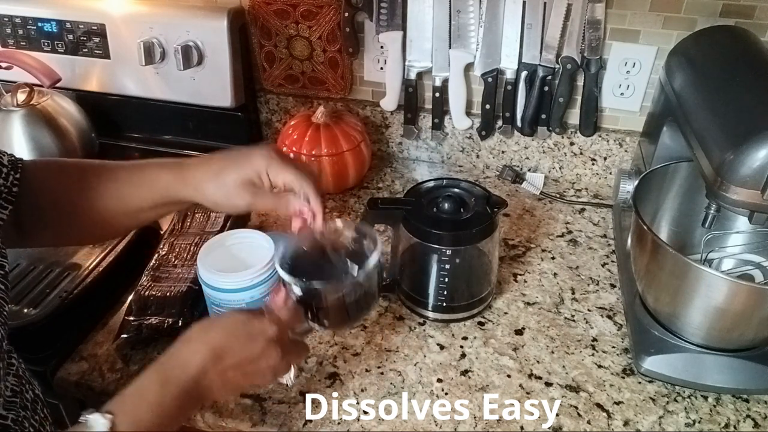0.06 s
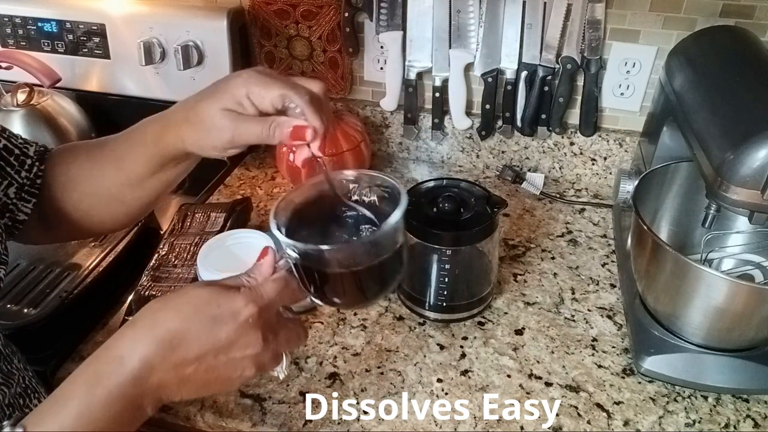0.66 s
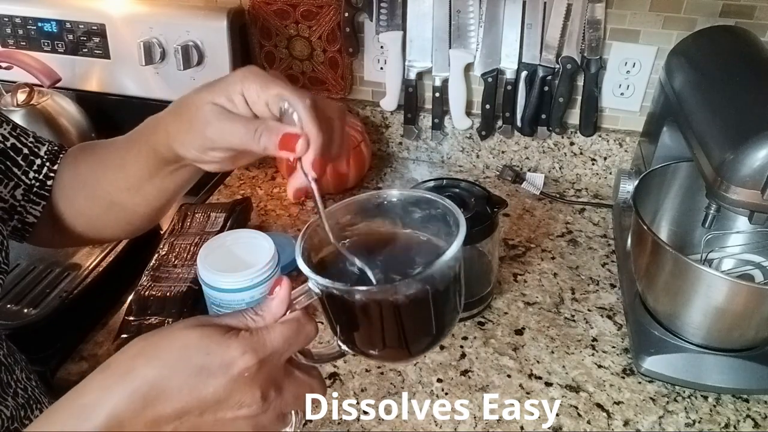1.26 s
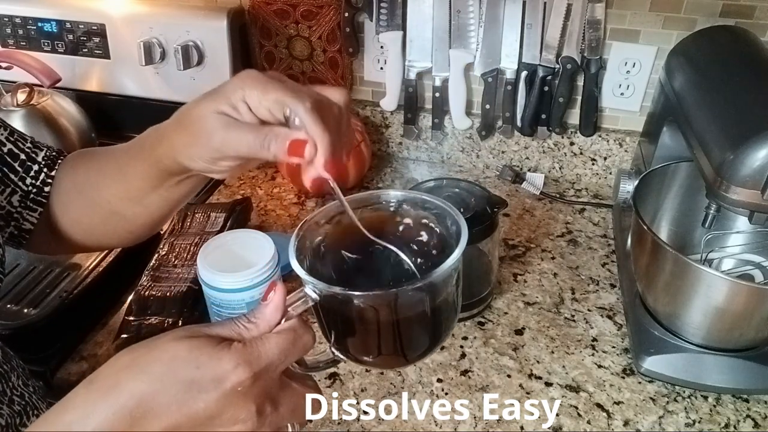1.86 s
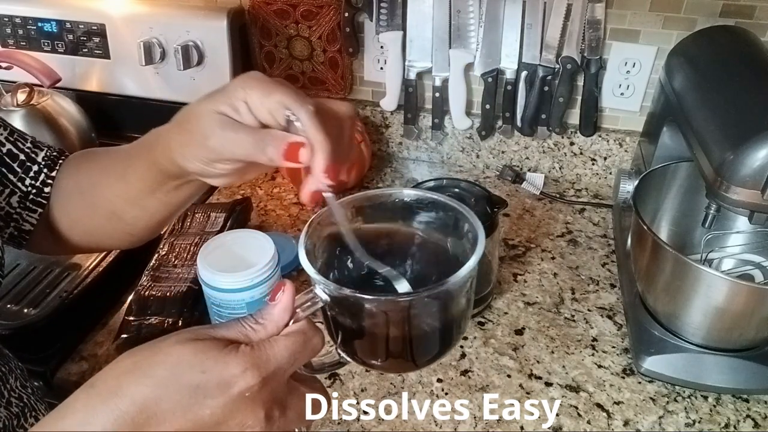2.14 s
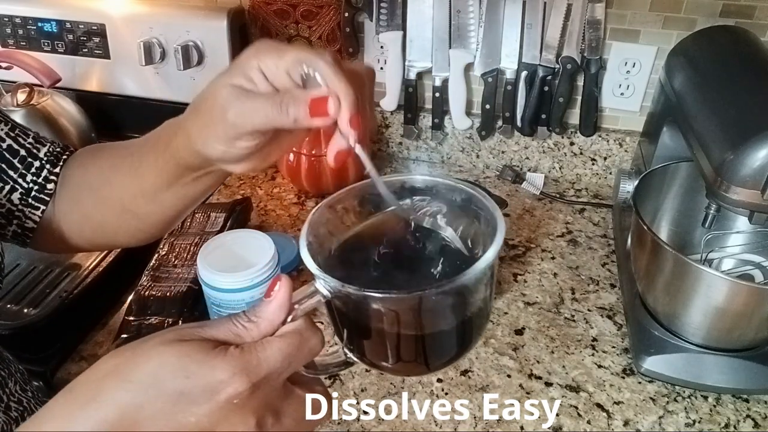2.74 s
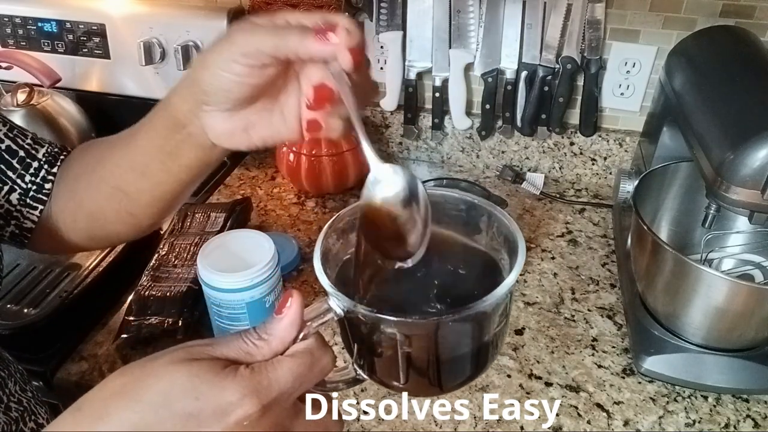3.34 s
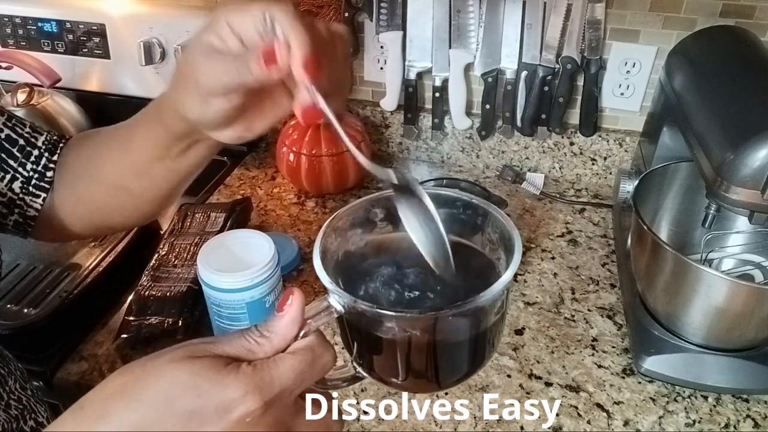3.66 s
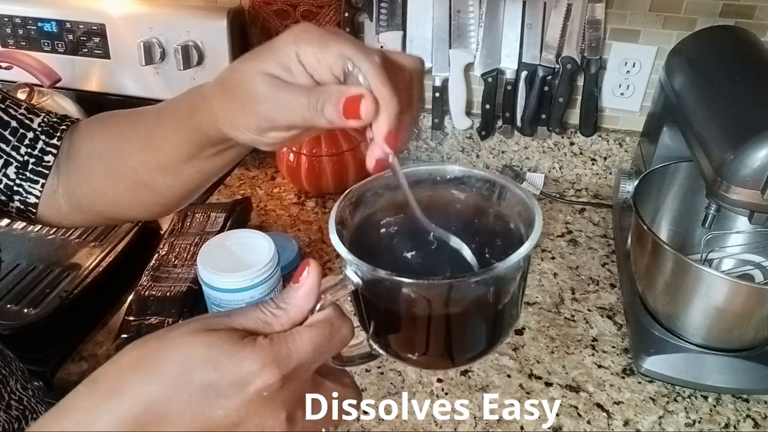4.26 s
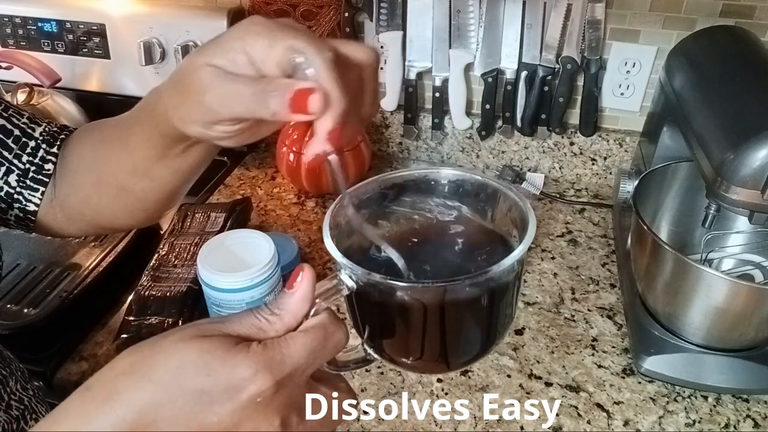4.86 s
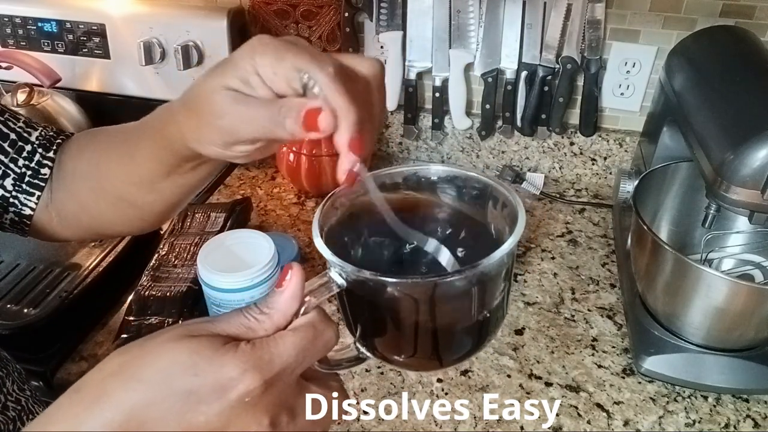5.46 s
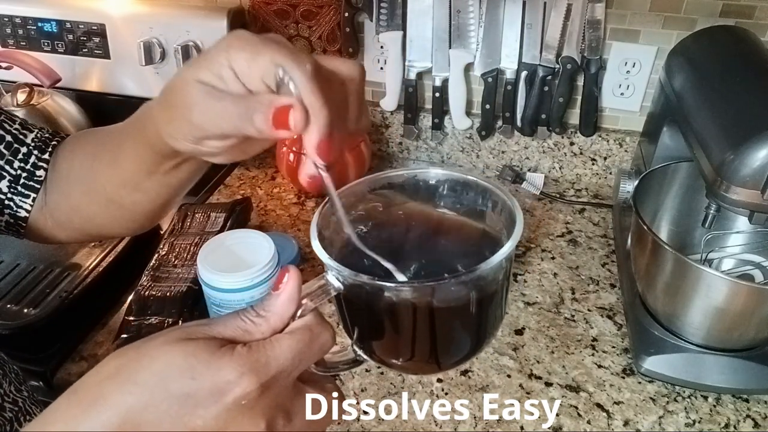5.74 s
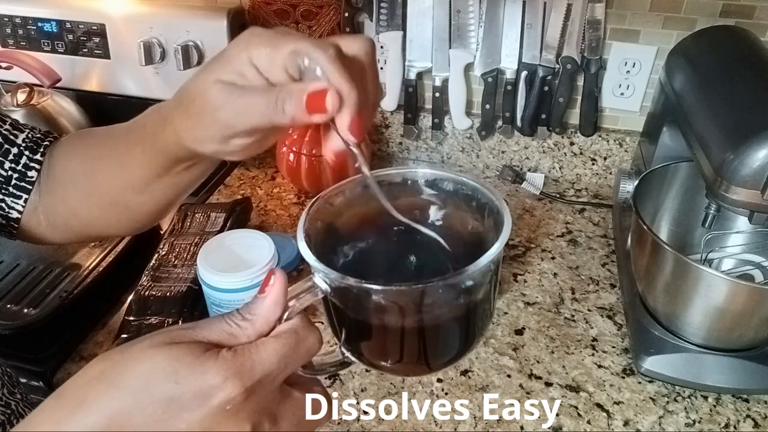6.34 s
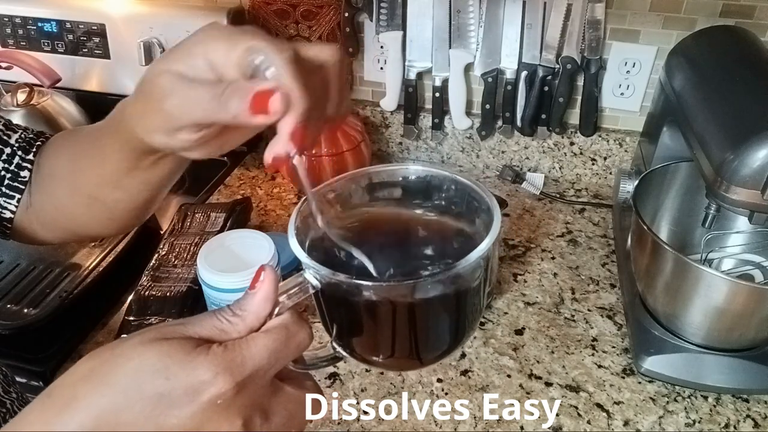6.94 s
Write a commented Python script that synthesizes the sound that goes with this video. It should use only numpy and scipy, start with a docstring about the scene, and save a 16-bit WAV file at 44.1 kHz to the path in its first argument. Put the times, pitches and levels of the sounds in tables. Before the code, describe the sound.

In a small kitchen with a faint refrigerator hum, a metal spoon clinks irregularly against a filled glass mug, heard up close. Each touch rings briefly, and the spoon sometimes scrapes or slides along the glass. Midway come a sharp clink, a few drips and a little plop, then the loudest clink. Lighter stirring carries on until the mug gives a quiet, hollow double knock.

```python
"""A refrigerator hums in a small kitchen while, close to a phone, a steel spoon stirs coffee in a glass mug.
Each clink rings the glass and some rebound; the spoon scrapes the wall, sings as it slides over the bottom
and nudges the side, while small bubbles ring in the swirl. Around three seconds in it is lifted out, drips
and dips back with a gulp. The hardest clink follows, the stirring goes on, and near the end the mug gives
a low, hollow double knock. Counter and tiles throw every touch back."""
import sys
import numpy as np
from scipy import signal
from scipy.fft import rfft, irfft, next_fast_len
from scipy.io import wavfile

SR = 44100
rng = np.random.default_rng(int(sys.argv[2]) if len(sys.argv) > 2 else 0)


def inscribe(sig):
    """Save sig as 16-bit PCM at rate SR to the path in sys.argv[1].

    A 1-D sig is mono; a 2-D sig holds one channel per row.
    Samples are clipped to [-1, 1] before scaling.
    """
    pcm = np.round(np.clip(np.atleast_2d(sig).T, -1, 1) * 32767)
    wavfile.write(sys.argv[1], SR, pcm.astype(np.int16))


N = 317079

# refrigerator partials: f/Hz, level/dB
FRIDGE_PARTIALS = [(59.2, -93), (80.7, -83), (162.5, -70.5), (328.4, -88), (360.7, -84.5)]
# colour of the room tone: f/Hz, relative level/dB
AIR_SPECTRUM = [(25, -3), (45, -3), (75, 8), (105, -2.5), (220, -0.5), (380, -5), (480, -13.5), (800, -18),
                (2000, -25.5), (7000, -27.5), (7950, -19.5), (9000, -23.5), (13000, -35), (15500, -36.5),
                (16500, -51)]
# spoon hits on the wall: t/s, strength/dB, hardness/(dB per octave), angle (0 edge first, 1 flat),
# featured partial f/Hz, low ring offset/dB, crack offset/dB, rebound delay/s, left minus right/dB
SPOON_HITS = [(0.0219, -40.5, 2, 0.48, 5960, -10, -4, 0.025, 2.5),
              (0.106, -51.5, -0.5, 0.54, 6010, -18, 0, 0, 3.5),
              (0.4798, -37, -2.5, 1, 5010, -13, -10.5, 0.015, -3),
              (.688, -63, 12.5, 1, 9630, -35, -5.5, 0.00087, 0),
              (1.3619, -30.5, 4, 0.4, 9050, -17.5, -2.5, 0.0038, -0.5),
              (1.5173, -30.5, 2, 0, 5400, -16, -3, 0.027, 2),
              (1.5619, -41.5, -1, 0.15, 2826, 1, -3, 0.0022, 3.5),
              (1.9342, -28, 0.5, 0, 9070, -12.5, 0, 0.00011, 1.5),
              (1.9775, -42, 3.5, 1, 8130, -5, 4, 0.0077, 4.5),
              (2.1419, -46, -2.5, 0.93, 2787, -12, 3.5, 0.00021, 1.5),
              (2.677, -31.5, 6.5, 0.48, 5060, -17, -0.5, 0.0027, -2.5),
              (2.7888, -33.5, 2.5, 0.48, 4990, -19, -6, 0.0064, 2),
              (2.9094, -19.5, 4, 0.029, 3196, -17, -8, 0.00079, 4.5),
              (3.893, -18, 6, 0.53, 5787, -7.5, -2, 0, 2),
              (4.0113, -27, 3.5, 0.84, 8190, -9, 0.5, 0.002, 3),
              (4.2284, -29.5, 2.5, 0.029, 9480, -18, 3.5, 0, 0.5),
              (4.3502, -51.5, 0.5, 0.12, 9340, -16.5, -0.5, 0.0011, -1.5),
              (4.7661, -33.5, -2, 0.057, 9730, -8.5, 0.5, 0.014, 3),
              (4.798, -36, -0.5, 0.94, 8160, -5, -2.5, 0.0039, 2),
              (5.2011, -37, -1, 0, 6030, -10.5, 2.5, 0.00017, 1),
              (5.9542, -33.5, -0.5, 0.52, 9730, -10.5, 3, 0.015, -0.5),
              (5.994, -32.5, -2.5, 0.83, 8150, -20, -7.5, 0.011, 1),
              (6.4178, -35, -0.5, 0.32, 2834, -26, -8, .015, -1),
              (6.818, -46.5, -0.5, 0.23, 10000, -4.5, 6, 0.017, -6)]
# modes of the filled mug with the spoon in it: f/Hz, level/dB, t60/s
MUG_MODES = [(1100, -6, .09), (1208, -1, .62), (1900, -13, .14), (2130, -8, .2), (2760, -8, .25),
             (2820, -2, .4), (3290, -7, .3), (3950, -16, .18), (4920, -6, .2), (5000, -2, .4),
             (5520, -7, .18), (5700, -5, .22), (6055, -4, .36), (6680, -15, .14), (7260, -11, .26),
             (8000, -7, .22), (8150, -2, .3), (8990, -2, .28), (9220, -4, .2), (9480, -5, .2),
             (9880, -4, .18), (10190, -12, .16), (11950, -13, .15), (13100, -13, .14), (14250, -20, .1)]
# colour of the contact crack: f/Hz, relative level/dB
CRACK_SPECTRUM = [(600, -12.5), (850, -8), (1150, 9), (1800, 1), (3200, 6.5), (4400, -0.5), (5600, 10.5),
                  (7400, -4.5), (9500, 9), (10800, -6), (12000, -6.5), (14000, -12.5), (15500, -19),
                  (16500, -25)]
# the spoon drags along the wall after a hit: t/s, length/s, level/dB
WALL_SCRAPES = [(0.03, .1, -57), (1.377, .13, -52.5), (4.239, 0.15, -49.5), (6.833, 0.12, -55)]
# its edge slides over the glass: t/s, nominal length/s, level/dB
EDGE_SLIDES = [(.582, 0.082, -78), (0.725, 0.026, -63.5), (1.154, 0.032, -71), (1.775, 0.024, -61),
               (2.282, 0.11, -68.5), (4.608, 0.023, -53.5), (4.981, 0.024, -68.5), (5.434, 0.024, -55),
               (5.571, 0.095, -70), (5.802, 0.039, -60.5), (6.197, 0.027, -67), (6.606, 0.034, -64),
               (7.029, 0.088, -73)]
# drips and bubbles, then the mug's low, hollow double knock (last two rows): t/s, starting f/Hz, level/dB
DRIPS_AND_KNOCKS = [(1.479, 5500, -32.5), (3.04, 2203, -36.5), (3.171, 1555, -49), (3.487, 13500, -42.5),
                    (3.509, 6200, -36.5), (3.524, 9480, -28.5), (3.549, 1640, -36.5), (3.566, 2810, -42),
                    (3.572, 1390, -50), (3.556, 8200, -41), (3.575, 4797, -43.5), (3.629, 5530, -43),
                    (3.724, 1810, -51.5), (3.723, 10260, -41.5), (4.398, 4410, -43), (5.156, 3660, -43),
                    (5.517, 3850, -42.5), (5.544, 11100, -45), (6.361, 3870, -50), (6.381, 10200, -49),
                    (6.765, 9670, -38), (6.822, 902, -42), (6.846, 831, -41.5)]
# the spoon leans softly on the wall: t/s, level/dB
WALL_NUDGES = [(1.722, -63.5), (4.561, -63.5), (4.62, -65.5), (4.984, -58), (5.432, -51.5), (5.754, -67),
               (6.152, -57), (6.575, -63)]
# contour of the gulp as the spoon dips back in: t/s, level/dB, resonance f/Hz
GULP_CONTOUR = [(3.50, -85.5, 2010), (3.526, -46.5, 1828), (3.547, -55, 1550), (3.573, -55.5, 1361),
                (3.60, -73, 1348), (3.68, -83, 1500)]
# shading of the microphones by the phone's body: f/Hz, left minus right/dB
MIC_SHADE = [(1200, -3.5), (3000, -3.5), (5200, -1), (7000, 10.5), (9200, -13.5), (14000, -5)]

REGISTER_EDGES_HZ = [2400, 4400, 7700, 11000]  # between low, middle, high, bright and sparkle
# voicing of the middle, high and bright registers for edge-first and flat hits
EDGE_DB, EDGE_LEADS_HZ = [-9.5, -14, -2], [2500, 7200, 9020]
FLAT_DB, FLAT_LEADS_HZ = [-6.5, -4, -6.5], [2825, 5000, 8150]
REGISTER_OCTAVES = [-.75, .15, .9]


def undb(db):
    """Decibels to gain."""
    return 10 ** (np.asarray(db) / 20)


def unit(x):
    """Scale to rms 1."""
    return x / np.sqrt(np.mean(x ** 2))


def seconds(length):
    """Time axis."""
    return np.arange(int(length * SR)) / SR


def fade(t, t60):
    """Exponential decay, 60 dB down at t60."""
    return np.exp(-np.log(1000) * t / t60)


def attack_level(x):
    """Root of the power in the first 20 ms, channels summed."""
    return np.sqrt(np.sum(np.mean(x[..., :SR // 50] ** 2, axis=-1)))


def noise(points, size):
    """White noise coloured by a spectrum of (Hz, dB) points."""
    hz, db = np.transpose(points)
    bins_hz = np.maximum(np.fft.rfftfreq(size, 1 / SR), 1)
    colour = undb(np.interp(np.log(bins_hz), np.log(hz), db))
    return irfft(rfft(rng.standard_normal(size)) * colour, size)


def band(x, lo_hz, hi_hz, order=4):
    """Band-pass filter."""
    return signal.sosfilt(signal.butter(order, [lo_hz, hi_hz], "band", fs=SR, output="sos"), x)


def drift(rate_hz):
    """Slow random modulation with a spread near 1."""
    return np.interp(np.arange(N) / SR * rate_hz, np.arange(1000), rng.standard_normal(1000))


def pan(db):
    """Channel gains for a left minus right level."""
    return undb(np.array([[db], [-db]]) / 2)


def add(out, start_s, x):
    """Mix x in at its start time."""
    i = max(int(start_s * SR), 0)
    out[..., i:i + x.shape[-1]] += x[..., :max(N - i, 0)]


def refrigerator():
    """A low hum whose partials waver in level and phase."""
    t = np.arange(N) / SR
    stereo_phase = np.array([[0], [.6]])
    hum = np.zeros((2, N))
    for hz, db in FRIDGE_PARTIALS:
        gain = np.sqrt(2) * undb(db + 0.28 * drift(12))
        hum += gain * np.sin(2 * np.pi * hz * t + .5 * drift(1.2) + stereo_phase)
    return hum * pan(3)


def room_air(level_db=-71.5, bass_hz=350, bass_side_db=-9):
    """A soft bed of room tone, wide on top and narrow in the bass."""
    mid, side = unit(noise(AIR_SPECTRUM, N)), unit(noise(AIR_SPECTRUM, N))
    bass = signal.sosfilt(signal.butter(1, bass_hz, fs=SR, output="sos"), side)
    side -= (1 - undb(bass_side_db)) * bass
    return np.array([mid + side, mid - side]) * undb(level_db + 0.84 * drift(2.1)) * pan(1)


def clinks(rebound_db=-6.5, rebound_angle=0.72, rebound_hz=5120, shortest_rebound_s=.004):
    """The spoon hits the wall and sometimes bounces, landing again softer and nearly flat."""
    out = np.zeros((2, N))
    for s, strength_db, hardness, angle, featured_hz, low_db, crack_db, rebound_s, pan_db in SPOON_HITS:
        add(out, s, hit(strength_db, hardness, angle, featured_hz, low_db, crack_db) * pan(pan_db))
        if rebound_s > shortest_rebound_s:
            rebound = hit(strength_db + rebound_db, hardness - 2, rebound_angle, rebound_hz, low_db, crack_db)
            add(out, s + rebound_s, rebound * pan(pan_db))
    return out


def hit(strength_db, hardness, angle, featured_hz, low_db, crack_db, usual_db=-30.5, contact_s=.0012):
    """Steel meets glass: the angle sets which registers ring, the hardness how bright and how long."""
    featured = np.arange(3) == np.searchsorted(REGISTER_EDGES_HZ[1:-1], featured_hz)
    upper_db = (1 - angle) * np.array(EDGE_DB) + angle * np.array(FLAT_DB)
    upper_db += 0.25 * hardness * np.array(REGISTER_OCTAVES) + 8.5 * featured
    force_db = strength_db - usual_db
    sparkle_db = -17.5 - 0.27 * force_db
    levels_db = strength_db + np.array([low_db, *upper_db, sparkle_db])
    detune = 1 + 0.0057 * rng.standard_normal(3)  # the spoon's depth retunes the leading partials
    leads_hz = np.array(FLAT_LEADS_HZ if angle > .5 else EDGE_LEADS_HZ) * detune
    leads_hz[featured] = featured_hz
    ring_scale = 0.49 + 0.02 * hardness + 0.055 * angle  # hard or flat hits damp the glass less
    clink = glass_ring(levels_db, leads_hz, 6 + 7 * featured, ring_scale, hardness)
    add(clink, 0, crack(strength_db + crack_db, hardness + .08 * force_db))  # stronger is brighter
    attack = 1 - np.exp(-np.arange(clink.shape[1]) / SR / contact_s)
    return clink * attack


def glass_ring(levels_db, leads_hz, lifts_db, ring_scale, hardness, grip_db=5, grip_t60=0.023):
    """The ring after a hit; it loses its first energy quickly while the spoon still touches."""
    hz, db, t60 = np.transpose(MUG_MODES).copy()
    register = np.searchsorted(REGISTER_EDGES_HZ, hz)
    for lead_hz, lift_db in zip(leads_hz, lifts_db):  # the nearest mode takes the lead
        k = np.argmin(abs(hz - lead_hz))
        hz[k], db[k], t60[k] = lead_hz, db[k] + lift_db, t60[k] * 1.2
    db[np.argmax(t60)] += 3  # the bowl's longest ring carries the low register
    detune = 1 + 0.0023 * rng.standard_normal(len(hz))
    modes = np.array([hz * detune, db + hardness * np.log2(hz / hz[0]), t60 * ring_scale])
    tones = np.array([mug(*modes[:, register == k]) for k in range(len(levels_db))])
    grip = 1 + undb(grip_db) * fade(np.arange(tones.shape[1]) / SR, grip_t60)
    registers = kitchen(radiate(tones * grip))
    return sum(undb(level_db) * np.array([side / attack_level(side) for side in stereo]) / np.sqrt(2)
               for level_db, stereo in zip(levels_db, registers))


def mug(hz, db, t60, stir_hz=2.35):
    """Decaying modes; the coffee climbs round the wall with each stir and bends their pitch."""
    t = np.float32(seconds(.5))
    hz, db, t60 = np.float32([hz, db, t60])[..., None]
    sway_hz = 32 * np.sqrt(1200 / hz)
    phase = 2 * np.pi * hz * t + sway_hz / stir_hz * np.sin(2 * np.pi * stir_hz * t)
    polarity = rng.choice([-1, 1], hz.shape)
    return np.sum(polarity * undb(db) * fade(t, t60) * np.sin(phase), axis=0)


def crack(level_db, tilt_db_per_octave, t60=0.039, snap_db=-4, snap_t60=.02, hump_db=3.5, hump_hz=100):
    """The contact transient: a brief rasp whose spectrum swells round each mode of the mug."""
    t = seconds(.15)
    decay = fade(t, t60) + undb(snap_db) * fade(t, snap_t60)
    hz = np.arange(500, SR / 2, 50)
    humps = sum(np.exp(-((hz - mode[0]) / hump_hz) ** 2) for mode in MUG_MODES)
    db = np.interp(hz, *np.transpose(CRACK_SPECTRUM)) + hump_db * np.minimum(humps, 1)
    db += tilt_db_per_octave * np.log2(hz / 4000)
    rasp = noise(np.transpose([hz, db]), len(t)) * decay / attack_level(decay)
    return kitchen(undb(level_db - 5) * radiate(rasp))


def radiate(x, low_cut_hz=730):
    """A small mug sends out almost no bass."""
    return signal.sosfilt(signal.butter(4, low_cut_hz, "high", fs=SR, output="sos"), x)


def kitchen(x, early_db=-4, early_t60=0.068, late_db=-11, low_t60=0.4, high_t60=.24, split_hz=4000):
    """Direct sound, slap from counter and tiles, then a darkening tail; new reflections on each call."""
    t = seconds(.3)
    early, late = rng.standard_normal((2, 2, len(t)))
    early = early * fade(t, early_t60) * (t > .001)
    dull = signal.lfilter(*signal.butter(1, split_hz, fs=SR), late)
    bloom = 1 - fade(t, 0.029)
    late = (dull * fade(t, low_t60) + (late - dull) * fade(t, high_t60)) * bloom
    paths = sum(undb(db) * echoes / np.linalg.norm(echoes, axis=1, keepdims=True)
                for echoes, db in [(early, early_db), (late, late_db)])
    paths[0, int(.001 * SR)] += 1  # the left microphone hears the mug later
    paths[1, 0] += 1
    size = next_fast_len(x.shape[-1] + len(t), real=True)
    spectrum = rfft(np.float32(x), size)[..., None, :] * rfft(np.float32(paths), size)
    return irfft(spectrum, size)[..., :N]


def scrapes(lo_hz=1950, hi_hz=3600, fall_db=-14):
    """Gritty slips that die down as the spoon leaves the wall."""
    out = np.zeros(N)
    for s, length, level_db in WALL_SCRAPES:
        t = seconds(length)
        grit = unit(band(rng.standard_normal(len(t)) ** 3, lo_hz, hi_hz, order=2))
        add(out, s, grit * undb(level_db + fall_db * t / length) * signal.windows.tukey(len(t), .2))
    return kitchen(out)


def slides(centre_hz=9380, width_hz=220, body_db=-7):
    """Dense tiny slips ring one high mode of the spoon and, faintly, the whole mug."""
    out = np.zeros(N)
    hz, db, t60 = np.transpose(MUG_MODES)
    body = mug(hz, db, t60 / 2)
    for s, length, level_db in EDGE_SLIDES:
        sing_hz = centre_hz * (1 + 0.0074 * rng.standard_normal())
        t = seconds(1.6 * length)
        swell = np.sin(np.pi * t / t[-1]) ** 2
        slips = np.pad(rng.standard_normal(len(t)) ** 3 * swell, (0, SR // 10))
        sing = band(slips, sing_hz - width_hz / 2, sing_hz + width_hz / 2, order=2)
        rub = unit(sing) + undb(body_db) * unit(signal.fftconvolve(slips, body)[:len(slips)])
        add(out, s - length / 4, undb(level_db - 3) * np.sqrt(length * SR / len(rub)) * rub)
    return kitchen(out)


def rising_ping(hz, cycles, rise=0.38, onset_cycles=5):
    """A damped tone gliding up, as a bubble does near the surface; pitched low, it voices a hollow knock."""
    t60 = cycles / hz
    t = seconds(t60)
    chirp = np.sin(2 * np.pi * hz * (t + rise * t ** 2 / (2 * t60)))
    return chirp * fade(t, t60) * (1 - fade(t, onset_cycles / hz))


def coffee_and_knocks(stray_count=60):
    """Bubbles in the swirl, drips and the spoon's splash, then the mug's low, hollow double knock."""
    out = splash()
    for s, hz, db in DRIPS_AND_KNOCKS:
        add(out, s, undb(db) * rising_ping(hz, cycles=92))
    for when, pitch, loudness in rng.random((stray_count, 3)):  # stray bubbles
        add(out, when * N / SR, undb(-76 + 17 * loudness) * rising_ping(1300 * 8 ** pitch, cycles=70))
    return kitchen(out)


def nudges(knee_hz=3000, fall_db_per_octave=-17, evenness=0.5, ring_scale=0.38):
    """Soft pushes wake the low modes about evenly and hardly reach the high ones."""
    out = np.zeros((2, N))
    hz, db, t60 = np.transpose(MUG_MODES)
    db = db * (1 - evenness) + fall_db_per_octave * np.maximum(np.log2(hz / knee_hz), 0)
    for s, level_db in WALL_NUDGES:
        ring = kitchen(mug(hz, db, t60 * ring_scale))
        add(out, s, undb(level_db) * ring / attack_level(ring))
    return out


def splash(flutter_hz=150, spray_db=-5):
    """The hollow behind the dipping spoon gulps, dropping in pitch, with a little spray."""
    t = np.arange(N) / SR
    s, db, hz = np.transpose(GULP_CONTOUR)
    flutter = unit(band(rng.standard_normal(N), 0.6, flutter_hz, order=2))
    gulp = unit(flutter * np.sin(2 * np.pi * np.cumsum(np.interp(t, s, hz)) / SR))
    spatter = band(rng.standard_normal(N) ** 3, 1200, 5000, order=1)
    spray = unit(band(spatter, 1100, 14000))
    envelope = undb(np.interp(t, s, db, left=-np.inf, right=-np.inf))
    return (gulp + undb(spray_db) * spray) * envelope


def phone_shade(x):
    """The phone's body shades the microphones, tipping each band to the left or right."""
    size = next_fast_len(N + SR // 10)
    hz, db = np.transpose(MIC_SHADE)
    gain = undb(np.interp(np.fft.rfftfreq(size, 1 / SR), hz, db) / 2)
    return irfft(rfft(x, size) * np.array([gain, 1 / gain]), size)[:, :N]


def scene():
    """The stirring up close, over a bed of hum and room tone."""
    stirring = clinks() + nudges() + scrapes() + slides() + coffee_and_knocks()
    return phone_shade(stirring) + refrigerator() + room_air()


def record(dry):
    """The phone soft-clips the loudest peaks and cuts the top."""
    ceiling, top_hz = .8, 16100
    rounded = ceiling * np.tanh(dry / ceiling)
    return signal.sosfilt(signal.ellip(10, .2, 80, top_hz, fs=SR, output="sos"), rounded)


dry = scene()
out = record(dry)
inscribe(out)
```